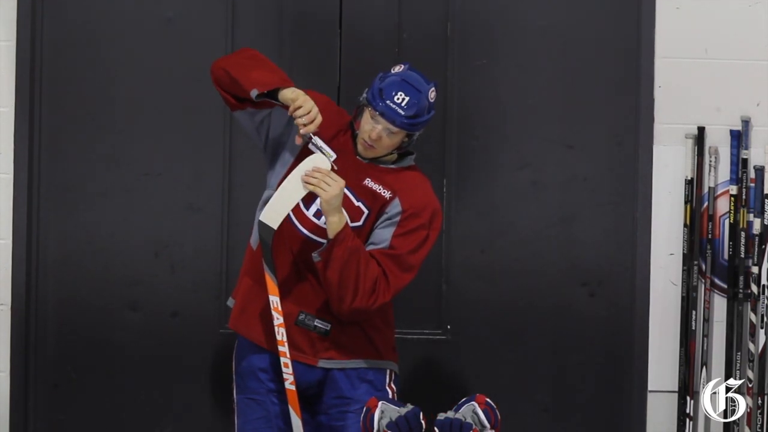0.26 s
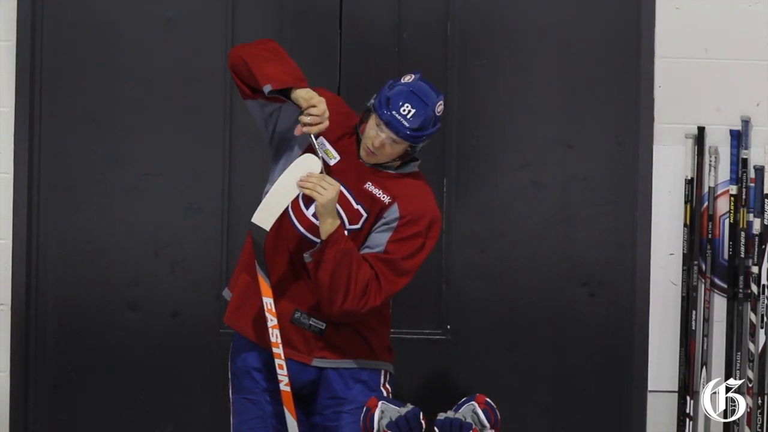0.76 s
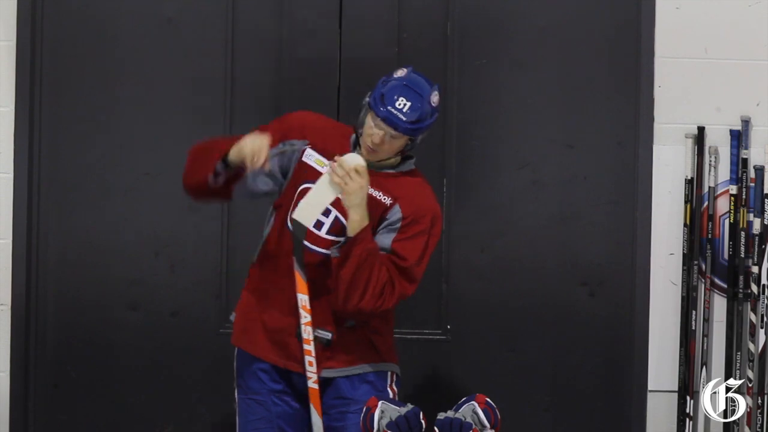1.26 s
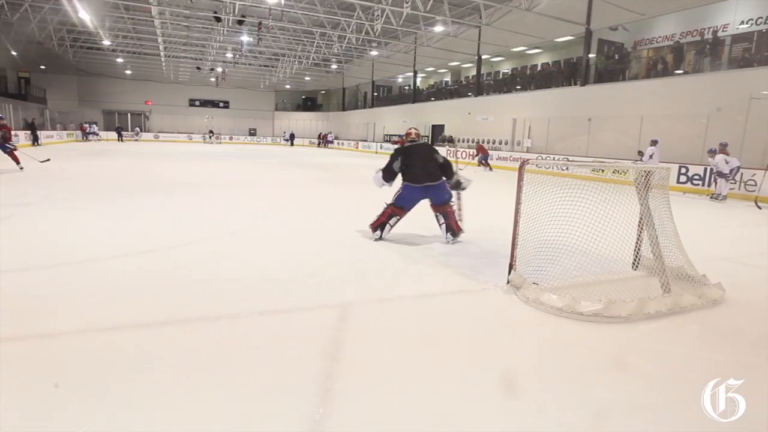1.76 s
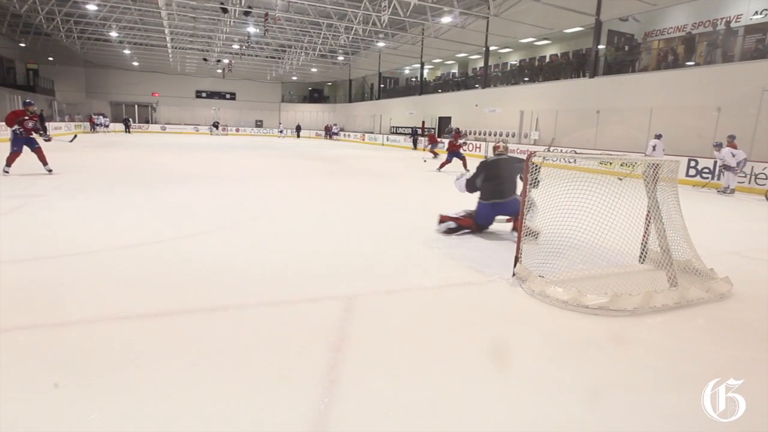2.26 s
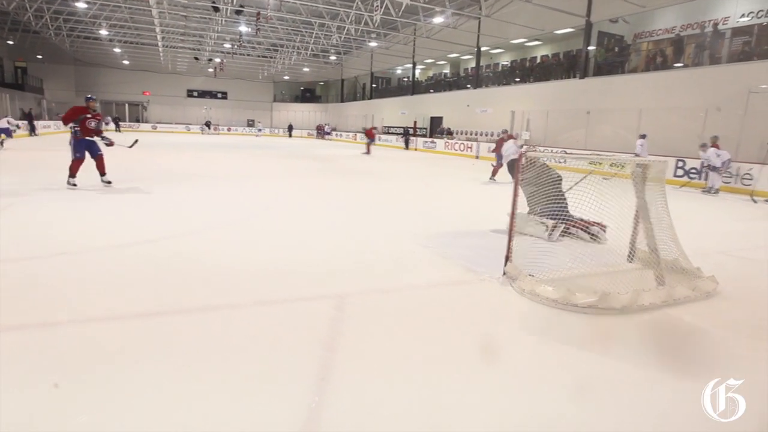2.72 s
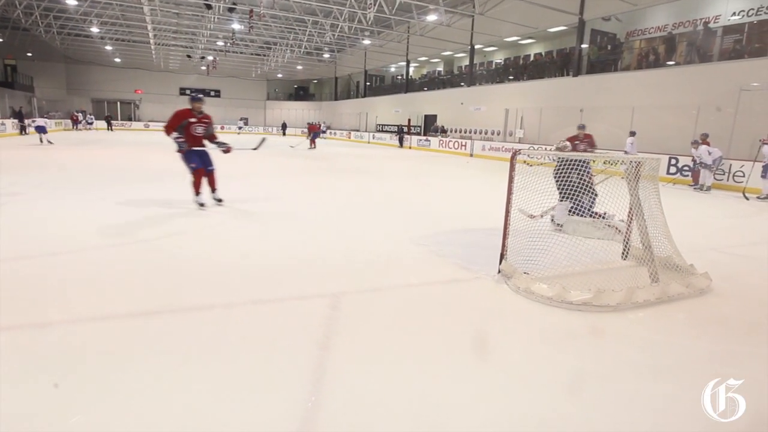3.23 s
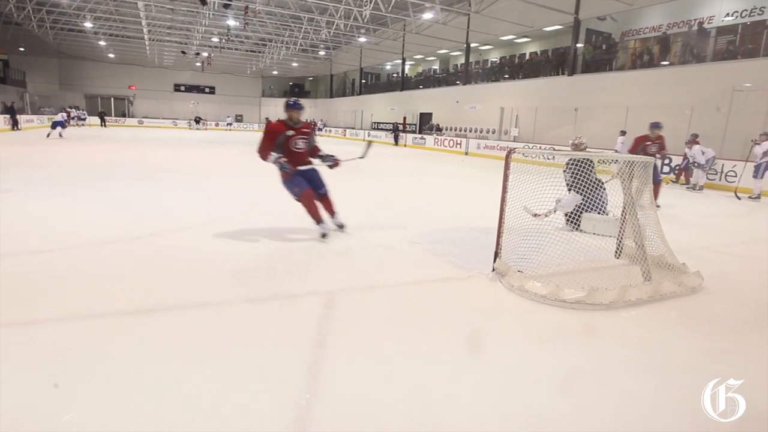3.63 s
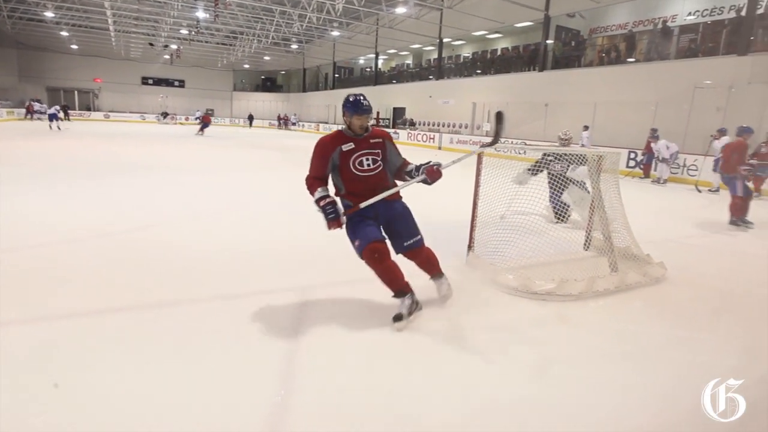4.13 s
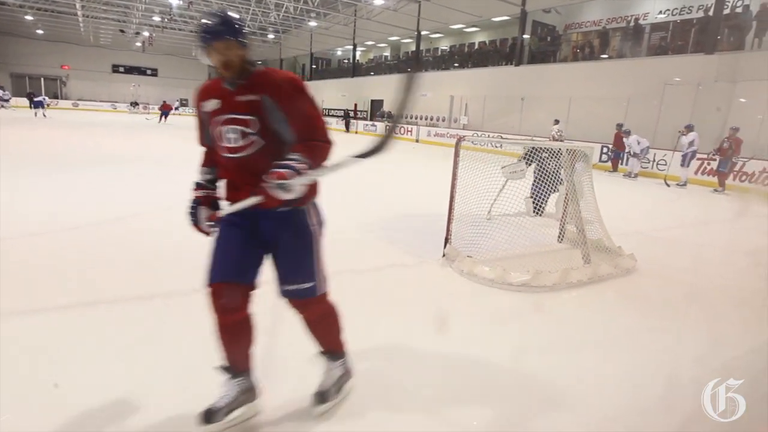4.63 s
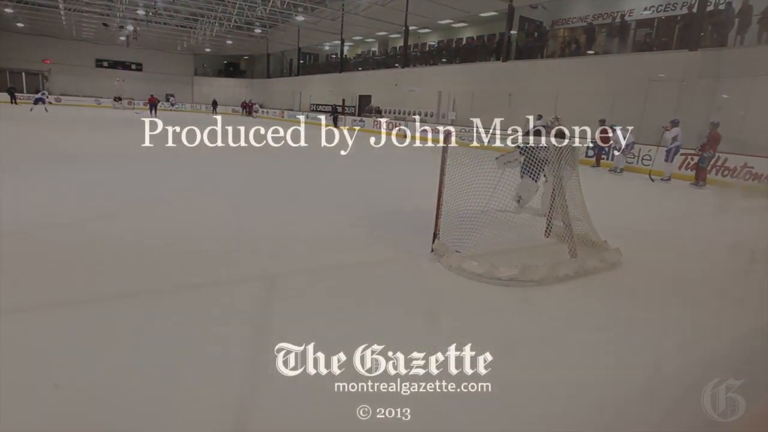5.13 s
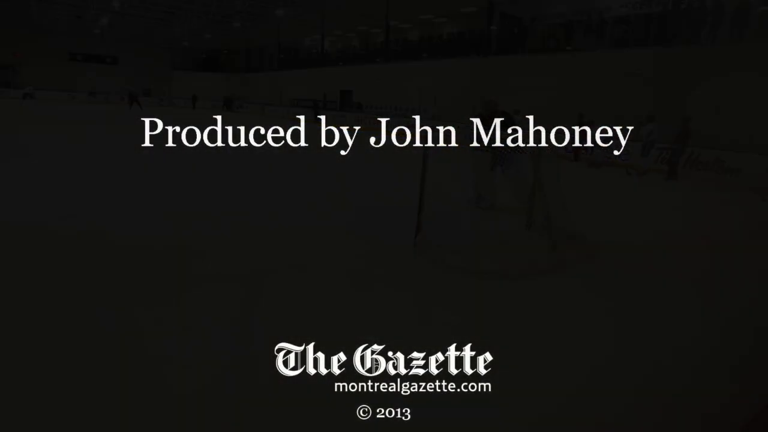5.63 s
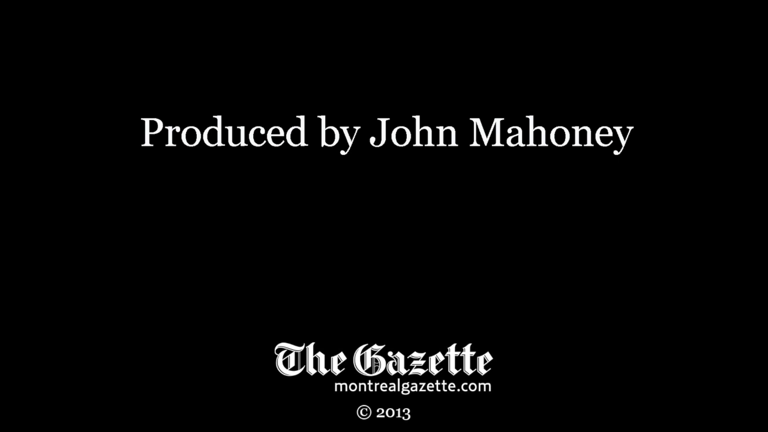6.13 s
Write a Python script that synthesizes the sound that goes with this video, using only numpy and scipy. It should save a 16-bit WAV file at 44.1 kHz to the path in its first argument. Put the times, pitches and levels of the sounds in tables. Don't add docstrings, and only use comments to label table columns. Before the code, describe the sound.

For the first 1.6 seconds an indoor ice rink is heard very faintly, with small dry stick ticks near 0.05, 0.55, 1.0 and 1.3. At 1.6 the sound abruptly opens to full level: a broad midrange hall roar, low rumble, soft booms of distant pucks on boards, and crisp blade scrapes. Around 2.15 two quick stick slaps coincide with a sharp skate scrape and snow spray. At 2.75 a close puck cracks on the boards, by far the loudest event, overloading the small microphone, with a short panel ring, echo and low shake; the background dips briefly and recovers. Gliding, humming blades and gritty scrapes continue, with a light slap at 3.74 and a hard double knock at 4.5, echoing. From about 5.15 the background fades under weak taps; a tiny steel post ping sounds at 5.53 with a bounce, then silence from 5.8.

```python
import sys
import numpy as np
from scipy import signal
from scipy.fft import rfft, irfft, next_fast_len
from scipy.io import wavfile
from scipy.ndimage import uniform_filter1d, map_coordinates

SR = 44100
rng = np.random.default_rng(int(sys.argv[2]) if len(sys.argv) > 2 else 0)


def volts_from_decibels(level):
    exponent = np.asarray(level, float) / 20
    return 10 ** exponent


def master_out(mix):
    frames = np.transpose(np.atleast_2d(mix))
    ceiling = np.clip(frames, -1, 1)
    pcm = np.round(ceiling * 32767).astype(np.int16)
    wavfile.write(sys.argv[1], SR, pcm)


N = 281137

CHANGE_S, END_S = 1.5742, 5.8
# (time [s], level [dB], crack t60 [s])
SHOT = (2.7515, 8.3, 0.12)


def unit(x):
    return x / np.sqrt(np.mean(x ** 2) + 1e-20)


def along(points, hz):
    f, v = np.transpose(points)
    return np.interp(np.log(hz + 1), np.log(f + 1), v)


def wobble(rate):
    knots = rng.standard_normal(int(N * rate / SR) + 4)
    return map_coordinates(knots, [np.arange(N) * rate / SR])


def filtered(x, response):
    m = next_fast_len(len(x) + 8192)
    return irfft(rfft(x, m) * response(np.fft.rfftfreq(m, 1 / SR)), m)[:len(x)]


def resonances(modes):
    def response(f):
        total = 0
        for k, (center, width, db) in enumerate(modes):
            damping = 1j * f * width
            total = total + (-1) ** k * volts_from_decibels(db) * damping / (center * center - f * f + damping)
        return total
    return response


def rush(spectrum, patchy_db, grit, grit_db):
    z = signal.stft(rng.standard_normal(N), nperseg=512)[2]
    field = uniform_filter1d(rng.standard_normal(z.shape), size=4, axis=0)
    field = uniform_filter1d(field, size=14, axis=1)
    smooth = signal.istft(z * volts_from_decibels(patchy_db * unit(field)), nperseg=512)[1][:N]
    chips = (rng.random(N) < grit / SR) * rng.standard_normal(N)
    mixed = unit(smooth) + volts_from_decibels(grit_db) * unit(chips)
    return unit(filtered(mixed, lambda hz: volts_from_decibels(along(spectrum, hz))))


def swells_db(rows, floor_db):
    t = np.arange(N) / SR
    power = volts_from_decibels(2 * floor_db)
    for s, db, rise, fall in rows:
        level = db - 20 * np.maximum((s - t) / rise, (t - s) / fall)
        power = power + volts_from_decibels(2 * np.maximum(level, -200))
    return 10 * np.log10(power)


def play_db():
    # (time [s], activity [dB])
    activity = [(0, -18.5), (.3, -19), (1.0, -17), (1.3, -18), (1.6, -17), (2.1, -16), (2.6, -17.5),
                (2.74, -17.5), (3.0, -19), (3.4, -19), (3.8, -18.5), (4.1, -17.5), (4.4, -19), (4.6, -18),
                (5.15, -20), (5.55, -17), (5.8, -15)]
    return np.interp(np.arange(N) / SR, *np.transpose(activity))


def rink():
    # (time [s], peak [dB], rise over 20 dB [s], fall over 20 dB [s])
    board_swells = [(.02, -20, .1, 0.16), (.32, -23.5, 0.33, .15), (.48, -21.5, .2, .2),
                    (1.0, -24, 0.82, 0.57), (1.37, -29, 0.11, 0.13), (1.73, -23.5, 0.53, 0.45),
                    (2.148, -19.5, 0.3, 0.099), (2.59, -27.5, 0.37, 0.061), (2.98, -21, 0.29, 0.2),
                    (3.2, -27.5, 0.14, 0.71), (3.45, -25.5, 0.14, 0.2), (3.61, -24.5, 0.09, 0.18),
                    (3.72, -23.5, 0.062, 0.42), (3.83, -21, .2, 0.14), (3.95, -29, 0.082, 0.07),
                    (4.1, -24.5, 0.14, 0.62), (4.48, -27.5, 0.25, 1), (5.36, -31, 0.11, 0.54),
                    (5.52, -23, 0.23, 0.24)]
    # (frequency [Hz], density [dB per Hz])
    rumble_spectrum = [(20, -34.5), (55, -26), (110, -16.5), (190, -3.5), (260, -2.5), (400, -12.5),
                       (800, -120)]
    boom_spectrum = [(150, -55.5), (310, -5.5), (380, 0.5), (430, -2.5), (485, 0.5), (600, -2.5),
                     (800, -27.5), (1500, -39), (3000, -120)]
    roar_spectrum = [(150, -51), (450, -10), (700, -4), (950, -1), (1130, -1), (1320, -0.5), (1600, -3),
                     (1900, -5), (3000, -16.5), (6000, -71)]
    roar_db = play_db() + 1.3 * wobble(13)
    boom_db = swells_db(board_swells, floor_db=-29.5)
    rumble = rush(rumble_spectrum, patchy_db=1.5, grit=30, grit_db=-14)
    boom = rush(boom_spectrum, patchy_db=0.5, grit=100, grit_db=-22.5)
    roar = rush(roar_spectrum, patchy_db=0.0, grit=480, grit_db=-12.5)
    rumble = volts_from_decibels(boom_db - 8.5 + 1.0 * wobble(6)) * rumble
    boom = volts_from_decibels(boom_db + 0.19 * wobble(6.3)) * boom
    return rumble + boom + volts_from_decibels(roar_db + 0.12 * wobble(30)) * roar


def blades():
    # (time [s], scrape peak [dB], snow relative to scrape [dB],
    # rise over 20 dB [s], fall over 20 dB [s])
    strokes = [(.07, -32, -30, 0.16, .4), (.47, -42, -27, .1, 1.4), (.73, -41, -18.5, .3, .4),
               (1.0, -43, -14.5, .15, .6), (1.22, -35, -10.5, 0.44, 0.54), (1.37, -28, -21, 0.18, 0.52),
               (1.58, -33, -20.5, .1, 0.81), (1.76, -32, -25.5, 0.299, 0.65), (1.98, -35, -13.5, .3, 0.51),
               (2.152, -23, -13, .03, .75), (2.54, -44, -31.5, .2, .8), (2.87, -24.5, -27.5, .1, .5),
               (2.98, -36.5, -35, 0.14, 0.36), (3.45, -38, -20.5, .5, 1), (3.76, -33.5, -13.5, 0.11, .8),
               (4.14, -29.5, -10.5, 1.1, .95), (4.51, -28, -32, .03, .3), (4.55, -27.5, -41, 0.045, 0.53),
               (5.15, -35, -19.5, .1, 0.51), (5.54, -23.5, -22, .02, 0.38)]
    # (frequency [Hz], density [dB per Hz])
    bite_spectrum = [(800, -49.5), (1600, -5), (2200, -1), (3050, -6.5), (3500, -10), (5000, -25.5),
                     (8000, -55), (12000, -89.5)]
    scrape_spectrum = [(800, -49), (2500, -5.5), (4000, 5.5), (5500, 0.5), (7500, -10.5), (10000, -28),
                       (15000, -56)]
    spray_spectrum = [(3000, -37), (6000, -2.5), (8300, 4.5), (10500, -7.5), (13000, -15.5), (16000, -21.5)]
    snow_falls_faster = 1.7
    glide_db, glide_snow_db = -45, -83
    scrapes = [(s, db, rise, fall) for s, db, _, rise, fall in strokes]
    sprays = [(s, db + snow, rise, fall / snow_falls_faster) for s, db, snow, rise, fall in strokes]
    scrape_db = swells_db(scrapes, glide_db)
    spray_db = swells_db(sprays, glide_snow_db)
    bite_db = play_db() - 3.5 + 0.39 * (scrape_db - scrape_db.mean())
    bite_db = bite_db - 0.17 * (spray_db - spray_db.mean())
    stride = wobble(12)
    bite = volts_from_decibels(bite_db + 1.1 * stride) * rush(bite_spectrum, patchy_db=-1.0, grit=350, grit_db=-12)
    scrape = volts_from_decibels(scrape_db + 0.21 * stride) * rush(scrape_spectrum, patchy_db=0.3, grit=710, grit_db=-13)
    spray = volts_from_decibels(spray_db + 0.45 * stride) * rush(spray_spectrum, patchy_db=0.3, grit=1200, grit_db=-12.5)
    return bite + scrape + spray


def hall_tail():
    # (frequency [Hz], t60 [s])
    decay_times = [(200, 1.6), (1000, 1.8), (4000, 1.1), (10000, .35)]
    hz, t, z = signal.stft(rng.standard_normal(SR), SR, nperseg=256)
    decay = volts_from_decibels(-60 * t / along(decay_times, hz)[:, None])
    tail = signal.istft(z * decay, SR, nperseg=256)[1][:SR]
    return tail / np.linalg.norm(tail)


def slaps():
    # (time [s], peak [dB], snap [Hz], knock [Hz], knock level [dB])
    contacts = [(.016, -50, 8500, 1500, -3), (0.0538, -25, 3650, 1490, 3.5), (0.07, -36, 3470, 1120, 9),
                (.458, -55, 8500, 1493, 0), (.477, -54, 10000, 1500, 0), (.545, -52, 7500, 1500, 0),
                (0.5635, -28.5, 4700, 1300, 11.5), (1.0116, -24.5, 3900, 1600, 11),
                (1.2735, -23, 3080, 1390, -4.5), (1.362, -44, 5500, 1310, 6),
                (2.142, -17.5, 3820, 1700, 2.5), (2.1584, -11.5, 4460, 600, 8.5),
                (2.36, -40.5, 11980, 1500, -10.5), (3.7424, -17.5, 5560, 400, -9),
                (4.5021, -4.5, 6240, 1150, 8), (4.548, -0.5, 2990, 860, 3.5), (5.149, -20, 5000, 1100, 9.5),
                (5.5353, -20.5, 3100, 1500, -4.5)]
    tick_t60_s, slap_t60_s = 0.014, 0.036
    tick_edge_db, slap_edge_db = -10.5, -14.5
    edge_delay_s, edge_hz = 0.0012, 9000
    out, t = np.zeros(N + 2 * SR), np.arange(SR) / SR
    release = resonances([(edge_hz, edge_hz, 0)])
    edge = filtered(1. * (t == 0), lambda f: release(f) ** 2)
    for s, db, snap_hz, knock_hz, knock_db in contacts:
        is_tick = s < CHANGE_S
        t60 = tick_t60_s if is_tick else slap_t60_s
        edge_db = tick_edge_db if is_tick else slap_edge_db
        crack = volts_from_decibels(-60 * t / t60) * (1 - np.exp(-t / 0.0002)) * rng.standard_normal(SR)
        modes = resonances([(knock_hz, 0.25 * knock_hz, knock_db), (snap_hz, 0.22 * snap_hz, 0)])
        colour = lambda f: modes(f) / (1 + 1j * f / 6000) ** 3
        direct = filtered(crack, colour)
        tail = filtered(np.pad(hall_tail(), (500, 0))[:SR], colour)
        hall_gain = volts_from_decibels(-5 + 0.26 * knock_db)
        out[round(s * SR):][:SR] += volts_from_decibels(db) / abs(direct).max() * (direct + hall_gain * tail)
        out[round((s + edge_delay_s) * SR):][:SR] += volts_from_decibels(db + edge_db - knock_db) * edge
    return out[:N]


def hum():
    # (time [s], level [dB], rise over 20 dB [s], fall over 20 dB [s], pitch [Hz])
    turns = [(.95, -20.5, 0.85, 0.98, 1300), (1.42, -23, 0.59, 0.78, 1470), (1.75, -27, 0.89, 1.6, 970),
             (2.0, -25.5, .5, .6, 1050), (4.0, -25, .5, 0.66, 1100), (2.5, -23.5, .8, 0.69, 720),
             (1.75, -31, 0.794, 1.5, 3700), (3.1, -24.5, .3, 1.7, 2800), (3.72, -22.5, 0.92, 0.69, 433),
             (3.05, -26.5, .3, 0.62, 400), (4.3, -27.5, 0.92, 0.99, 390), (4.56, -20, 0.057, .5, 900),
             (4.85, -23, .8, 1.3, 1120), (4.3, -25.5, 0.36, 1.2, 2600), (5.16, -29.5, 0.3, .8, 1080)]
    out = np.zeros(N)
    for s, db, rise, fall, hz in turns:
        blade = resonances([(hz, 0.3 * hz, 0)])
        tone = unit(filtered(rng.standard_normal(N), lambda f: blade(f) ** 4))
        out += volts_from_decibels(swells_db([(s, db, rise, fall)], -92)) * tone
    return out


def shot():
    # (frequency [Hz], width [Hz], level [dB])
    crack_modes = [(980, 360, -8.5), (1760, 430, -3), (2110, 420, -1.5), (2800, 590, -5),
                   (5000, 4300, -13.5)]
    panel_modes = [(110, 560, -16), (475, 90, -0.5), (706, 61, -6.5)]
    # (frequency [Hz], density [dB per Hz])
    thud_spectrum = [(40, -32), (90, -12.5), (160, 5), (240, -7.5), (400, -35.5), (900, -120)]
    s, db, t60 = SHOT
    t = np.maximum(np.arange(N) / SR - s, 0)
    late = np.maximum(t - 0.045, 0)
    crack = volts_from_decibels(-60 * t / t60) * (1 - np.exp(-t / 0.00027))
    echo = volts_from_decibels(-25.5 - 60 * (late / 0.16) ** 2) * (1 - np.exp(-late / 0.0043))
    ring = volts_from_decibels(-7.5 + 1.5 * wobble(70) - 60 * (t / 0.15) ** 1.5) * (1 - np.exp(-t / 0.0018))
    shake = volts_from_decibels(-35.5 - 60 * t / 2.6) * (1 - np.exp(-t / 0.0033))
    noise = lambda response: unit(filtered(rng.standard_normal(N), response))
    board = resonances(crack_modes)
    board_noise = noise(lambda f: board(f) / (1 + 1j * f / 6500) ** 2)
    panel_noise = noise(resonances(panel_modes))
    thud_noise = noise(lambda hz: volts_from_decibels(along(thud_spectrum, hz)))
    return volts_from_decibels(db) * ((crack + echo) * board_noise + ring * panel_noise + shake * thud_noise)


def post():
    # (time [s], level [dB])
    blows = [
        (5.509, -53),
        (5.533, -39.5),
        (5.587, -48.5),
    ]
    # (frequency [Hz], level [dB], t60 [s])
    steel_modes = [(3500, 0, 0.13), (4010, 2, 0.14), (5260, -1, .06), (7500, -9.5, .06), (8500, -14, .1),
                   (10000, -19, .08), (11400, -29, .06)]
    out = np.zeros(N)
    for s, blow_db in blows:
        t = np.maximum(np.arange(N) / SR - s, 0)
        for hz, db, t60 in steel_modes:
            level_db = blow_db + db - 60 * t / t60 + 3.02 * wobble(60)
            out += volts_from_decibels(level_db) * np.sin(2 * np.pi * hz * t)
    return out


def fader():
    t = np.arange(N) / SR
    fade = np.clip((END_S - t) / 0.66, 0, 1) ** 2
    return np.where(t < CHANGE_S, volts_from_decibels(-23.5), fade)


def duck():
    depth_db, recover_s = -3.5, 0.075
    since = np.arange(N) / SR - SHOT[0]
    recovery = np.exp(-(np.maximum(since, 0) / recover_s / 2) ** 2)
    return volts_from_decibels(depth_db * (since > 0) * recovery)


def scene():
    background = fader() * duck() * (rink() + blades() + hum())
    return np.tile(background + slaps() + shot() + post(), (2, 1))


def low_pass(x):
    return signal.sosfilt(signal.butter(12, 15820, fs=SR, output="sos"), x)


def record(dry):
    t = np.arange(N) / SR
    since = np.maximum(t - SHOT[0] - 0.0025, 0)
    ceiling = 1 - 0.47 * (1 - np.exp(-since / 0.0013)) * (since < 0.12)
    mix = np.clip(dry, -ceiling, ceiling) * (t < END_S) - 0.0071 * fader()
    return low_pass(mix)


dry = scene()
out = record(dry)
master_out(out)
```